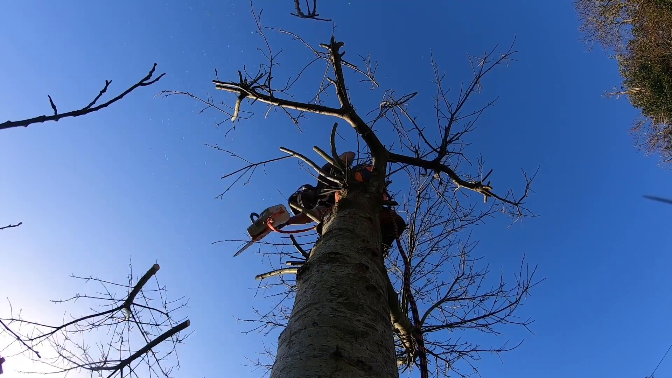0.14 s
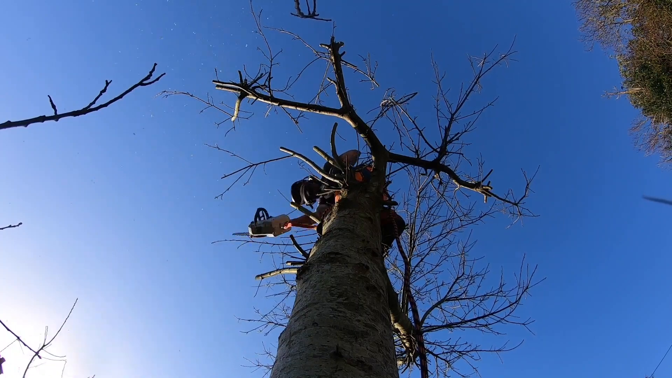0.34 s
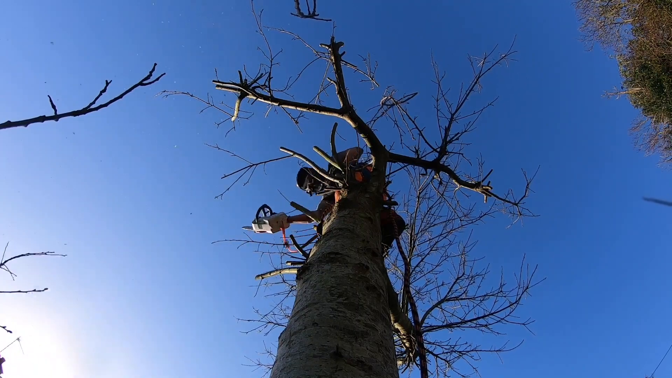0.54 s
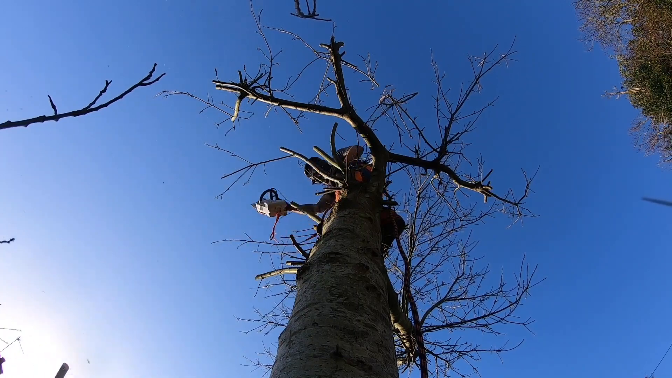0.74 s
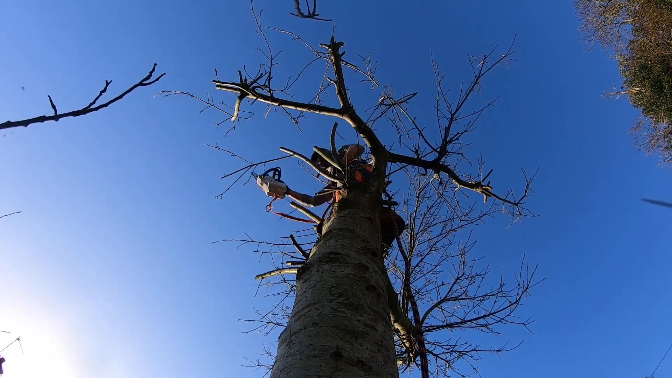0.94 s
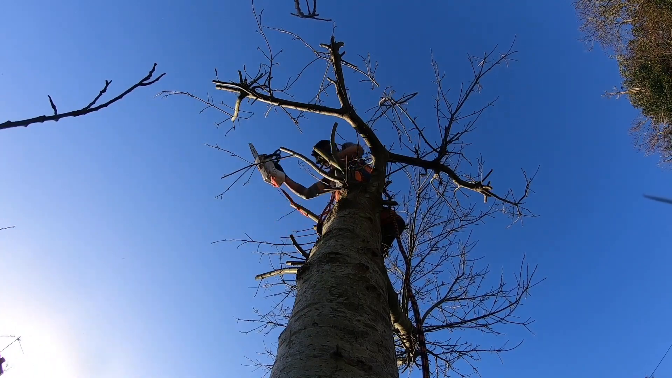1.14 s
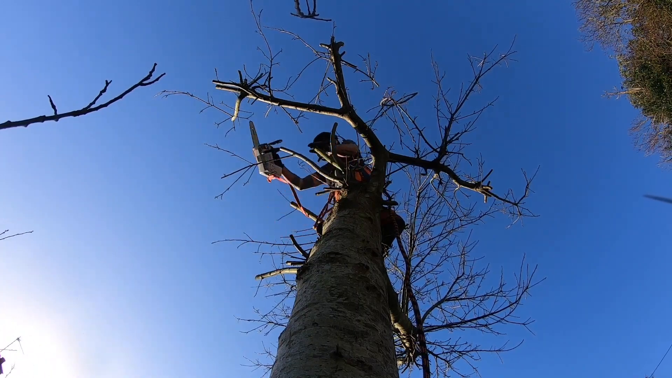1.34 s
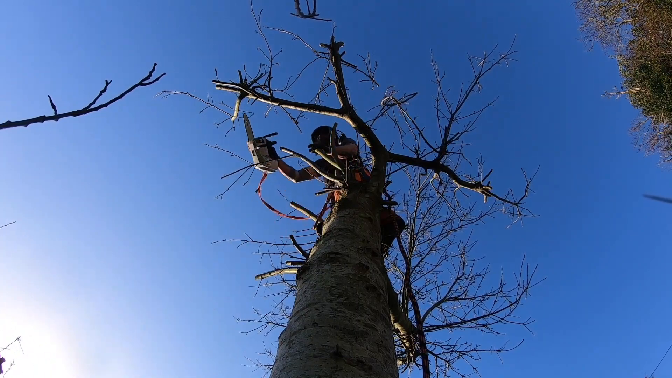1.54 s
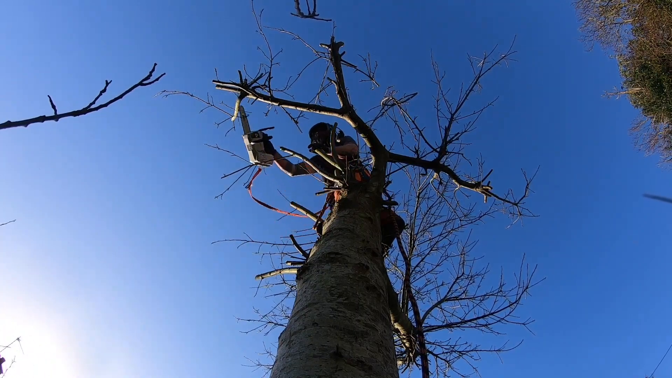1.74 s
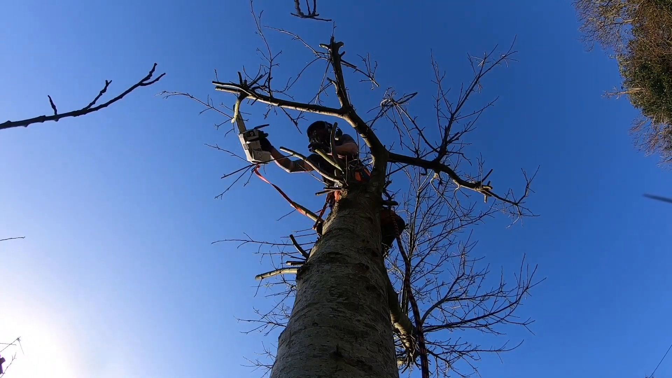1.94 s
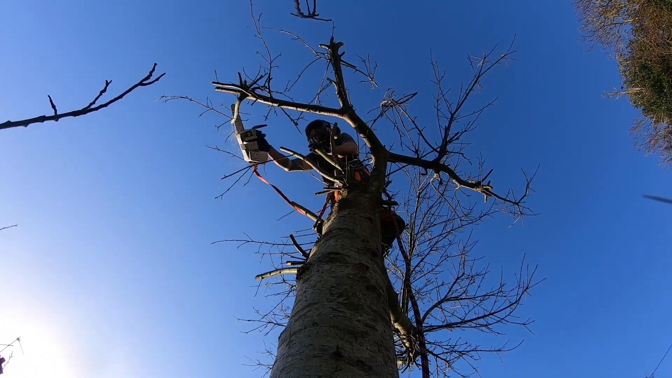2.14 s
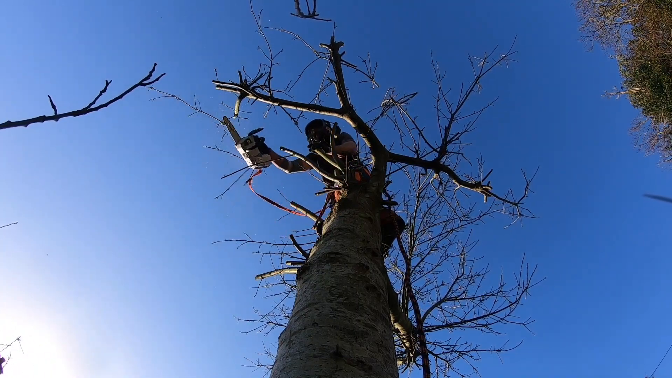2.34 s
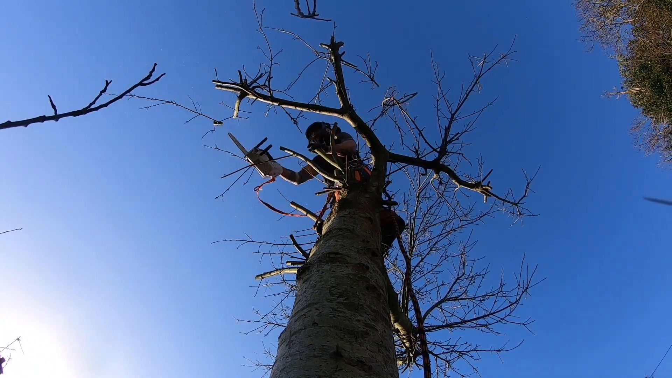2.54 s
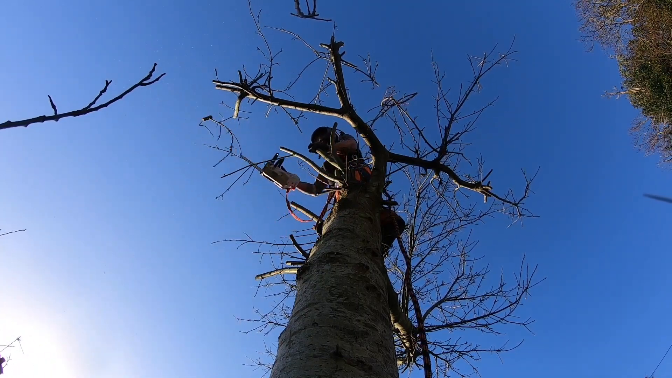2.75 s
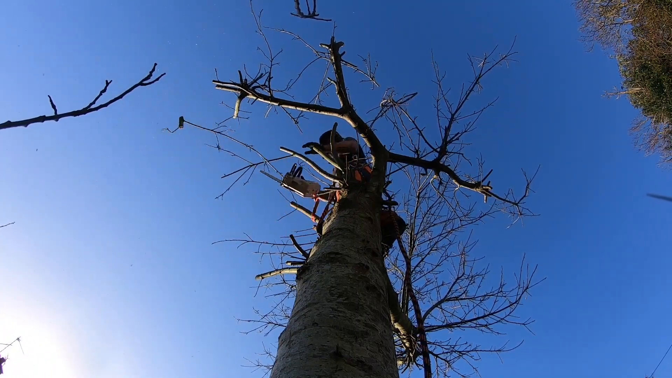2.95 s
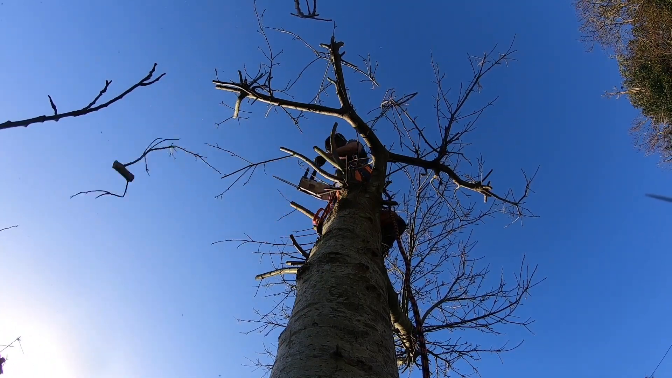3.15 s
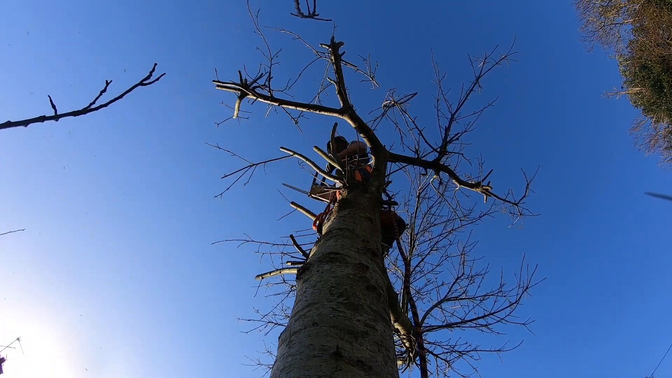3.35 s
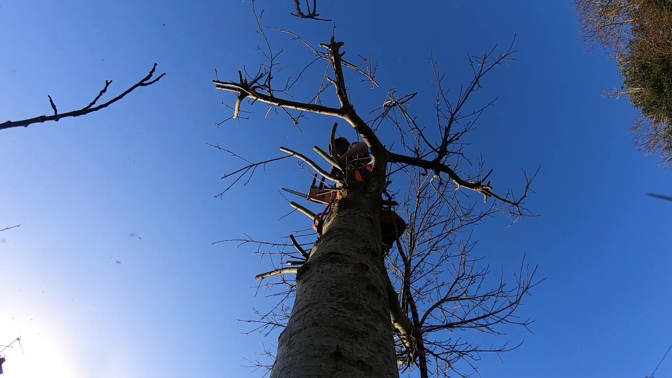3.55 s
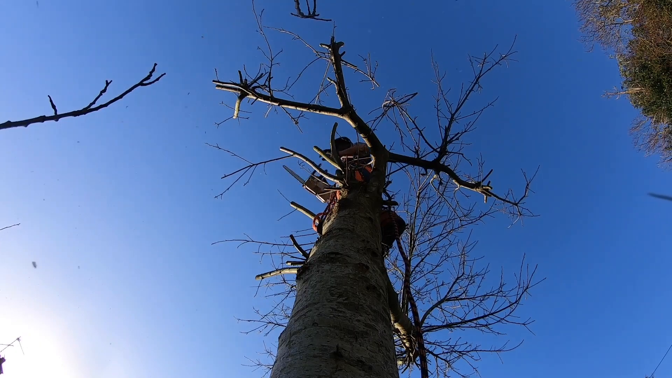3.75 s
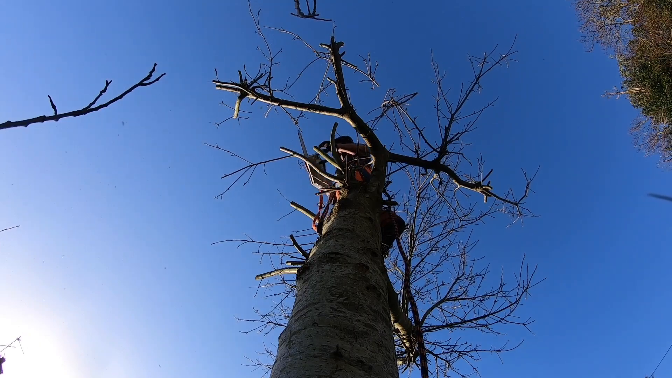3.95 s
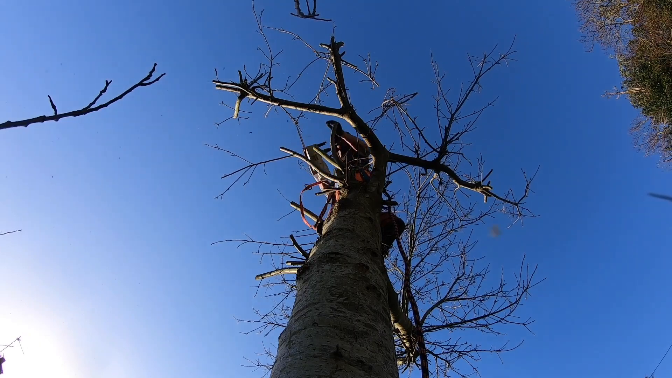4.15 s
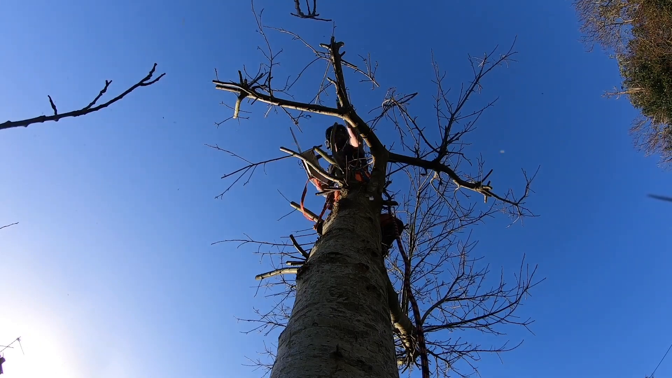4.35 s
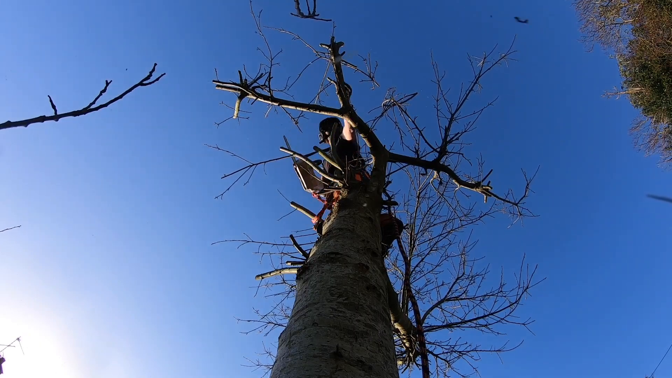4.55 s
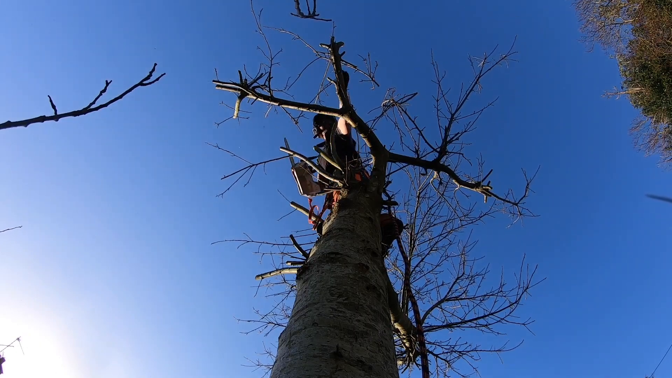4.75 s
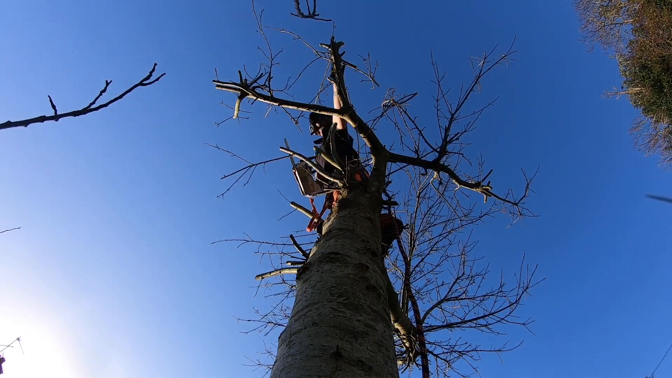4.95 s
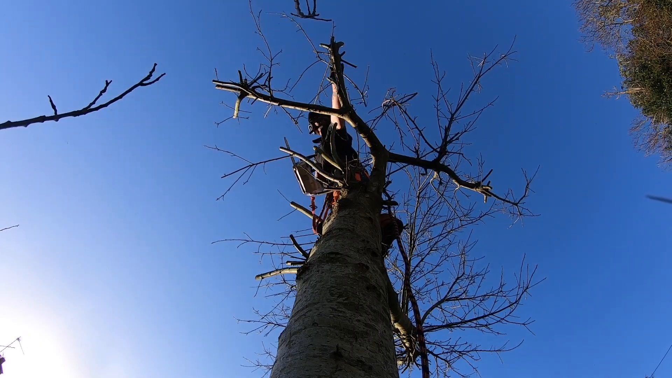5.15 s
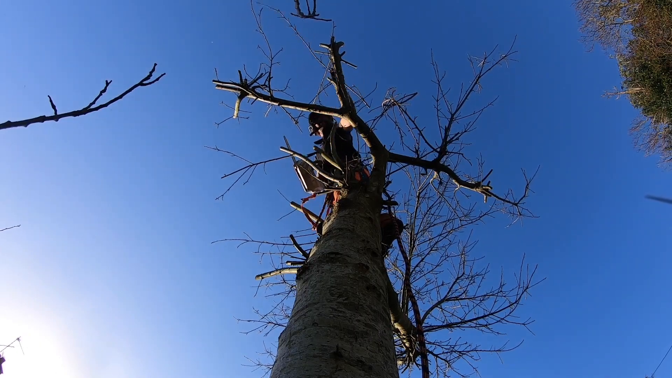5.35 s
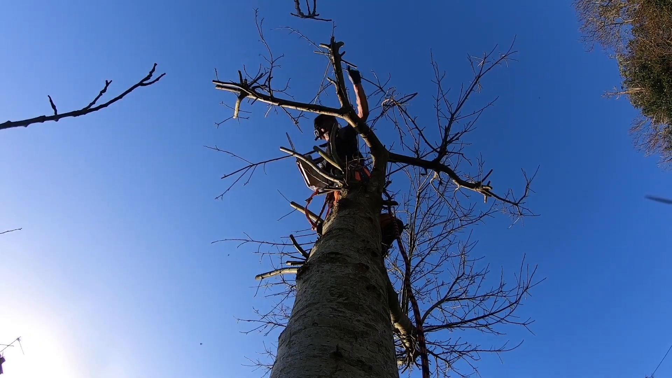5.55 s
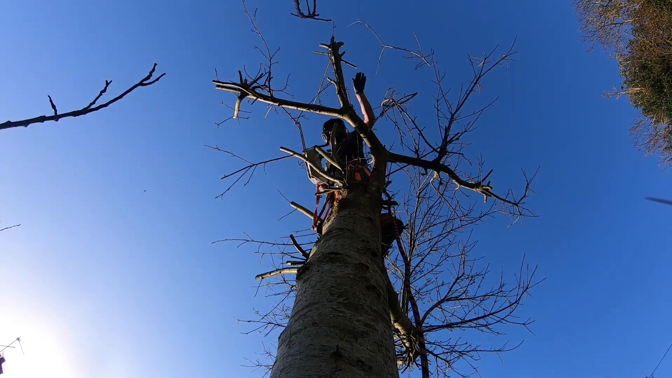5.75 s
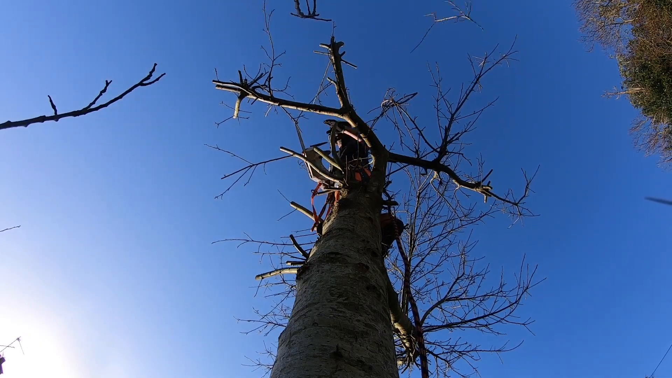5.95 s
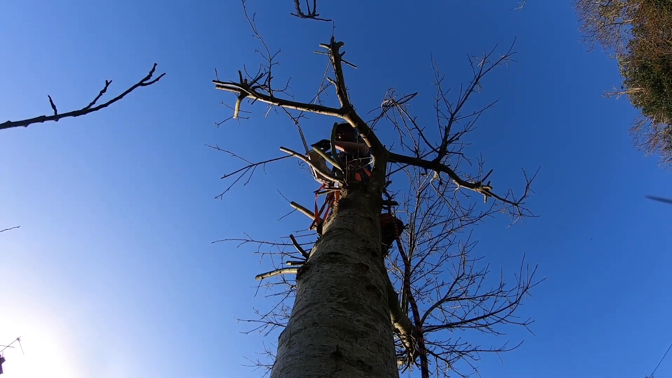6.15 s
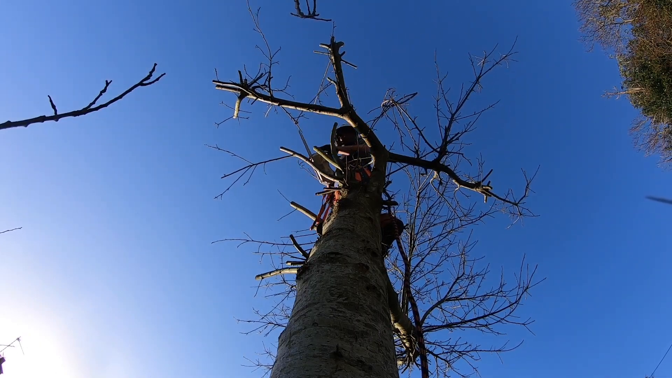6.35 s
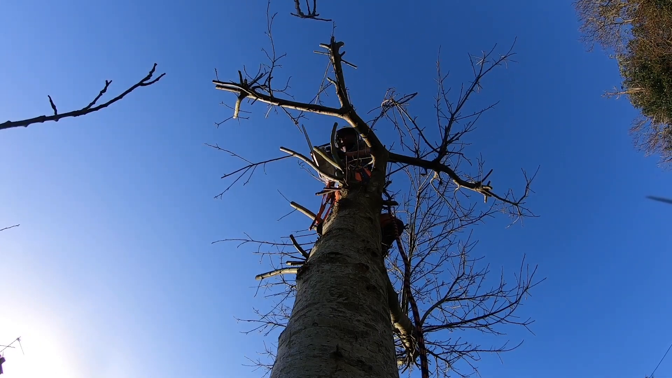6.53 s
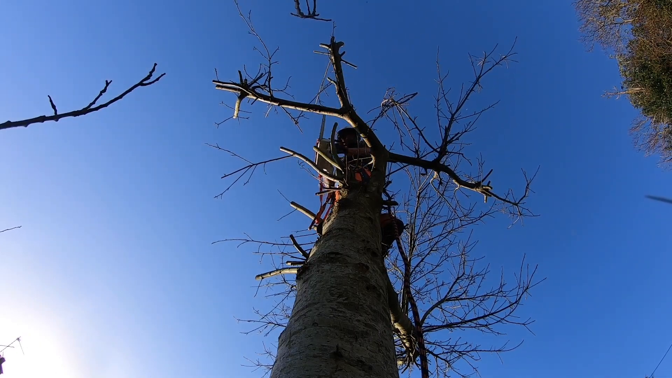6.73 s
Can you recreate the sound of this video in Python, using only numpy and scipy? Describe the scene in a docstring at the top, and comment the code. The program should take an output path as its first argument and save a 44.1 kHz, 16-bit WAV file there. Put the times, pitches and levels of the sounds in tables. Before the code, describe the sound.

A battery chainsaw overhead winds down, a cut branch crashes, then the saw whines up for a short cut and chips tick down.

```python
"""Chainsaw high in a bare tree

A battery saw overhead runs down, then spins up and cuts a limb; the microphone is in a camera at the foot.
Motor harmonics whine, random clicks make the chain rattle, and cutter pulses drum the limb's resonances.
Shaped noise makes a branch crash, chips ticking on the camera and debris; pitch-dropping rings over low
thumps make dull knocks, the first the low end of an earlier cut.
Trilled birds, a far engine note and gusting bands of open air lie behind."""
import sys
import numpy as np
from scipy import signal
from scipy.fft import rfft, irfft, next_fast_len
from scipy.io import wavfile
from scipy.ndimage import uniform_filter1d

SR = 44100
rng = np.random.default_rng(int(sys.argv[2]) if len(sys.argv) > 2 else 0)


def gain_from_db(level_db):
    """Turn a decibel level (scalar or array-like) into a linear amplitude factor."""
    decades = np.asarray(level_db, float) / 20
    return 10 ** decades


def dump(signal):
    """Clip the signal to [-1, 1] and save it as 16-bit WAV at the path in sys.argv[1]."""
    limited = np.clip(np.atleast_2d(signal).T, -1, 1)
    pcm = np.round(limited * 32767).astype(np.int16)
    wavfile.write(sys.argv[1], SR, pcm)


N = 299439
T = np.arange(N) / SR  # s
SIZE = next_fast_len(N + SR)  # room for filter tails
HZ = np.fft.rfftfreq(SIZE, 1 / SR) + 1e-3  # just above 0, safe for logarithms and division

# pulls of the trigger: (pulled [s], let go [s], coasting time [s], chain level at full speed [dB])
TRIGGER_PULLS = [(-1, .068, 0.23, -22), (1.51, 2.4445, 0.22, -22.5)]
# unloaded pole rate, spin-up time, fade of the drive on release, bend of the run-down
FREE_HZ, SPIN_UP_S, LET_GO_S, COAST_BEND = 1313, .155, .008, 1.5
POWER_DB_PER_OCT, COAST_DB_PER_OCT = 4, 6  # rattle against speed, driven and coasting
# below this pole rate the rattle dies away, coasting and driven
SLACK_HZ, SLACK_DB_PER_HZ, POWER_SLACK_DB_PER_HZ = 390, 0.18, 0.05
CUT_S, THROUGH_S = 1.972, 2.25  # chain bites, load leaves the motor
SAG, SAG_LAG_S, LOAD_WHINE_DB = .062, .045, -5  # share of speed lost under load, its lag, change of whine
# broad colour of the chain rattle: (frequency [Hz], level [dB per Hz])
CHAIN_COLOUR = [(120, -36), (350, -10.5), (700, -14), (1500, -14), (2500, -6.5), (4300, -10), (7000, -12.5),
                (15000, -17.5)]
# saw resonances and dead spots: (frequency [Hz], width [Hz], first run [dB], second run [dB])
SAW_RESONANCES = [(1010, 68, 1, 5), (1890, 350, 7, -2.5), (3300, 400, 9.5, 6), (3815, 200, 8.5, 5.5),
                  (4430, 470, -4, -5), (5350, 830, 8, 3.5), (6200, 700, -6, 1), (7140, 700, 6, 2),
                  (8350, 420, -7.5, -8.5), (9430, 1300, 9.5, 2.5), (12490, 4000, 4, -0.5)]
# pole rate and its overtones 2 to 4, over the chain and before the housing: level [dB]
WHINE_HARMONICS = [-11.5, -4, -3.5, -10]
# motor housing's colour, the saw facing another way in each run: (frequency [Hz], first [dB], second [dB])
HOUSING_COLOUR = [(400, -7.5, -6.5), (700, 1, -1.5), (1000, -7, 0), (1270, -12, -10.5), (1910, -2, -11.5),
                  (2500, -1, 0), (3300, -15, -10), (3920, -4, -18), (5200, -1, -1.5)]
# far traffic and breeze, relative: (frequency [Hz], level [dB per Hz])
AIR_COLOUR = [(25, -1.5), (66, -3), (112, -7.5), (160, 1.5), (240, -3), (330, -10), (600, -18),
              (1000, -19.5), (2200, -33.5), (4000, -32.5), (15000, -53.5)]
# stereo spread of the air: (frequency [Hz], side minus mid [dB])
AIR_SPREAD = [(60, -9.5), (250, -11), (900, 4), (4000, -2.5), (10000, -1)]
# overall air: (time [s], level [dB])
AIR_CURVE = [(0, -52), (6.79, -56.5)]
# dull knocks, the first the low end of an earlier cut; before their treble is softened:
# (time [s], knock level [dB], ring [Hz], thump level [dB])
DULL_KNOCKS = [(0.03, -40, 358, -37.5), (0.425, -16, 646, -39.5), (3.403, -25, 450, -54),
               (3.417, -32, 485, -50), (3.429, -36, 262, -33), (3.455, -21, 1300, -38),
               (3.475, -31, 1210, -58), (4.715, -36.5, 240, -39.5), (4.781, -15, 439, -66),
               (4.912, -35.5, 264, -42), (5.41, -49, 680, -46.5), (5.503, -33.5, 1145, -72.5),
               (5.819, -35.5, 275.5, -40), (5.879, -35.5, 331, -41.5), (6.369, -33.5, 390, -77),
               (6.597, -39, 1010, -47)]
THUMP_HZ, THUMP_T60_S = 74.4, 0.28
# a branch thrashing down through twigs: (time [s], level [dB])
CRASH_CURVE = [(.34, -67), (.404, -54), (.415, -44.5), (.7, -50.5), (.85, -46.5), (.89, -55.5), (1.24, -58),
               (1.3, -68.5), (1.5, -63.5)]
# colour of its snapping twigs: (frequency [Hz], level [dB per Hz])
TWIG_COLOUR = [(700, -7.5), (1200, -4.5), (3400, -3), (5000, -11), (9000, -12.5), (15000, -19.5)]
# single twigs breaking in the crash, at the tree: (time [s], peak level [dB], colour [Hz])
TWIG_SNAPS = [(0.7613, -29.5, 5650), (.822, -28, 3400), (0.845, -31, 4000), (0.8938, -33.5, 3300),
              (0.9157, -29.5, 2690), (0.947, -32, 2770), (1.0116, -34, 2250), (1.054, -33, 2300)]
# the limb cut and torn: (time [s], cutter note level [dB], body modes level [dB], deep modes level [dB])
BITE_CURVES = [(1.975, -30, -41, -47.5), (2.04, -29.5, -39, -43.5), (2.11, -41.5, -37, -38.5),
               (2.2, -27, -36, -33), (2.25, -25, -29.5, -31.5), (2.28, -37.5, -22, -31.5),
               (2.315, -45, -30, -29), (2.42, -69.5, -70, -46.5)]
# resonances of the limb: (frequency [Hz], relative level [dB])
LIMB_MODES = [(60, -6.5), (105, -4.5), (151, -2.5), (308, -2.5), (400, -3), (592, 0), (861, -13.5),
              (1040, -7)]
# far birds: (start [s], length [s], start pitch [Hz], end pitch [Hz], level [dB])
BIRD_CALLS = [(3.056, 0.17, 4800, 3910, -70.5), (3.785, .14, 5200, 4850, -73),
              (4.304, .2, 4900, 4930, -60.5), (5.079, 0.24, 5257, 5350, -58),
              (5.576, 0.19, 4560, 3800, -64), (6.279, .2, 5340, 5300, -69)]
# chips on the camera: (time [s], peak level before panning [dB], colour [Hz], left minus right [dB])
CHIP_TICKS = [(3.4033, -33, 2110, 4.5), (3.4502, -32, 3600, 8), (3.477, -34, 3800, 16),
              (3.508, -39, 3600, 1), (3.6737, -36.5, 7000, 0), (3.692, -21, 7400, -8.5),
              (3.706, -28, 4950, -4), (3.7775, -38, 3290, 1), (3.8089, -36, 7900, -0.5),
              (3.8297, -20, 6660, -9.5), (3.9409, -29.5, 9340, 10.5), (3.978, -27, 7940, -8),
              (4.003, -29, 5570, -7), (4.011, -31.5, 4700, -4), (4.1495, -39, 1710, -2),
              (4.1797, -25.5, 7960, 2.5), (4.2437, -18.5, 2470, -2.5), (4.2483, -24, 7700, -18),
              (4.3336, -37.5, 4700, -3.5), (4.516, -30.5, 7270, -7), (4.562, -29.5, 8080, -11),
              (4.577, -30.5, 8250, -18), (4.653, -26, 6300, -10), (4.6702, -27.5, 8450, -3),
              (4.6757, -32.5, 4530, -1), (4.7074, -38.5, 1490, -1), (4.781, -35, 3930, 1),
              (4.943, -21.5, 8970, -2), (5.213, -40.5, 2700, 0), (5.4178, -36.5, 2860, 0),
              (5.499, -37.5, 1680, 3), (5.8683, -45, 2520, -1), (6.3711, -41.5, 2780, 1)]
# ringing of the camera case: (frequency [Hz], level [dB], 60 dB decay [s])
CASE_MODES = [(1626, -18.5, 0.025), (8000, -16.5, 0.011)]
# showers of small debris: (start [s], end [s], twig rustle level [dB], fine grit level [dB])
DEBRIS_SHOWERS = [(3.416, 3.555, -62.5, -59), (3.612, 4.696, -72.5, -65), (5.123, 5.286, -64.5, -75),
                  (5.358, 5.419, -59.5, -73.5), (5.87, 5.933, -66, -92), (6.578, 6.688, -79, -62)]
SHOWER_EDGE_DB_PER_S = 700
# far engine note: (time [s], pitch [Hz], level [dB])
DRONE_CURVE = [(5.6, 200, -65), (6.79, 242.3, -58)]
# sound from above at the two microphone ports:
# (frequency [Hz], left leads [rad], left minus right [dB], unlike part level [dB])
PORT_RESPONSE = [(60, 0, -6, -6), (250, 0, -.5, -22), (690, -.5, -4, -13), (1200, 1.1, 3, -7),
                 (2200, -.3, 2, -20), (4300, 0, -.5, -22), (7000, .5, -1, -10), (8600, 2.2, 4, -5),
                 (14000, 1.6, 4, -1)]
MIC_HZ, MIC_SHELF_DB = 10410, -19.5  # treble loss of the microphone


def unit(x):
    """Scales to rms 1."""
    return x / np.sqrt(np.mean(x ** 2))


def along(table, rest=-150.):
    """Draws a table's columns out over time; levels are silent outside it."""
    s, *columns = np.transpose(table)
    return [np.interp(T, s, c, left=rest, right=rest) for c in columns]


def over_hz(table, order=1):
    """Draws one column of a frequency table on every bin, along log frequency."""
    return np.interp(np.log(HZ), np.log(np.transpose(table)[0]), np.transpose(table)[order])


def colour(x, gain):
    """Weights each frequency."""
    return irfft(rfft(x, SIZE) * gain, SIZE)[..., :N]


def peak(hz, width):
    """One resonance, gain 1 at the centre, width in Hz."""
    return 1 / (1 + 1j * (HZ / hz - hz / HZ) * hz / width)


def walk(rate):
    """Random levels held 1 / rate s and smoothed twice."""
    k = int(SR / rate)
    steps = np.repeat(rng.standard_normal(N // k + 1), k)
    return 1.65 * uniform_filter1d(uniform_filter1d(steps, k), k)[:N]


def clicks(rate, scatter_db):
    """Random clicks, about rate a second, a few much louder than most."""
    size = gain_from_db(scatter_db * np.minimum(rng.exponential(size=N), 5)) * rng.choice([-1, 1], N)
    return unit(size * (rng.random(N) < rate / SR))


def add(out, s, sound):
    """Mixes a short sound in at time s."""
    i = int(s * SR)
    out[..., i:i + sound.shape[-1]] += sound[..., :N - i]


def fade(t, t60):
    """Exponential ring-down by 60 dB in t60 s, held within 0.002 to 1 s."""
    return np.exp(-np.log(1000) * t / np.clip(t60, .002, 1))


def soft(x, width):
    """Zero below 0, x above, rounded at the knee."""
    return width * np.logaddexp(0, x / width)


def motor(pulled, let_go, coast_s, full_db):
    """Pole rate rises to a limit, sags under load and coasts down; the chain level follows it."""
    lag = 1 / (SAG_LAG_S * SR)
    load = signal.lfilter([lag], [1, lag - 1], (T > CUT_S) & (T < THROUGH_S))
    spin_up = 1 - np.exp(-np.clip(T - pulled, 0, None) / SPIN_UP_S)
    coast = np.exp(-(soft(T - let_go, LET_GO_S) / coast_s) ** COAST_BEND)
    hz = 1 + FREE_HZ * spin_up * (1 - SAG * load) * coast
    off = np.clip((T - let_go) / coast_s * 2, 0, 1)  # 0 driven, 1 coasting
    per_oct = POWER_DB_PER_OCT + off * (COAST_DB_PER_OCT - POWER_DB_PER_OCT)
    slack = POWER_SLACK_DB_PER_HZ + off * (SLACK_DB_PER_HZ - POWER_SLACK_DB_PER_HZ)
    chain_db = full_db + per_oct * np.log2(hz / FREE_HZ) - slack * soft(SLACK_HZ - hz, 70.0)
    return hz, chain_db, off, load


def chain_rattle(turn, run):
    """Links slap as random clicks, coloured by the resonances and dead spots of the saw."""
    resonance_db = sum(db[run] * abs(peak(f, w)) ** 2 for f, w, *db in SAW_RESONANCES)
    body = gain_from_db(over_hz(CHAIN_COLOUR) + resonance_db)
    # harder once every four pole periods, and every forty as the chain joint comes round
    beat = 1 + .25 * np.cos(turn / 4) + .1 * np.cos(turn / 40)
    return unit(colour(beat * clicks(12000, 1.2), body))


def motor_whine(hz, turn, run):
    """Harmonics of the pole rate, weaker at low speed, swell through each housing resonance they cross."""
    whine = 0
    for k, db in enumerate(WHINE_HARMONICS):
        level = gain_from_db(db + 2.6 * walk(45) - 0.039 * soft(560 - hz, 39.0))
        whine = whine + level * np.sin((k + 1) * turn)
    return colour(whine, gain_from_db(over_hz(HOUSING_COLOUR, order=run + 1)))


def saw():
    """Motor speed drives whine and rattle in both runs, and the cutters drum the limb in the second."""
    out = 0
    for run, pull in enumerate(TRIGGER_PULLS):
        hz, chain_db, off, load = motor(*pull)
        turn = 2 * np.pi * np.cumsum(hz * (1 + 0.0025 * walk(90))) / SR  # phase of the pole rate
        out = out + gain_from_db(chain_db + 0.18 * walk(29.83)) * chain_rattle(turn, run)
        # the whine sinks under load and as the motor coasts
        whine_db = chain_db - 6.3 * off + LOAD_WHINE_DB * load
        out = out + np.sqrt(2) * gain_from_db(whine_db) * motor_whine(hz, turn, run)
    return out + limb_drumming(turn)


def air():
    """Far traffic and breeze: noise in octave bands that each flicker, the bass gusting most."""
    out, shape = 0, gain_from_db(over_hz(AIR_COLOUR))
    for hz in 30 * 2. ** np.arange(10):
        band = shape * np.clip(1 - abs(np.log2(HZ / hz)), 0, 1) ** .5
        mid = colour(rng.standard_normal(N), band)
        side = colour(rng.standard_normal(N), band * gain_from_db(over_hz(AIR_SPREAD)))
        gust_db = (1 + 150 / (hz + 60)) * walk(9) + 1.5 * walk(2)
        out = out + gain_from_db(gust_db) * (mid + side * np.array([[1], [-1]]))
    s, db = np.transpose(AIR_CURVE)
    return gain_from_db(np.interp(T, s, db)) * unit(out)


def knocks():
    """Dull knocks, the first the low end of an earlier cut: pitch-dropping ring, broad tail and low thump."""
    out, t = np.zeros(N), T[:SR // 3]
    chance = rng.standard_normal((len(DULL_KNOCKS), 2, len(t)))
    boom = signal.iirpeak(THUMP_HZ * 1.54, 1.5, SR)
    for (s, db, hz, thump_db), noise in zip(DULL_KNOCKS, chance):
        ring = np.sin(2 * np.pi * hz * t * (1 - 12 * t)) * fade(t, 7 / hz) * (1 - np.exp(-t / 0.0009))
        dull = signal.iirpeak(hz * 0.7, 1.4, SR)
        tail = unit(signal.lfilter(*dull, signal.lfilter(*dull, noise[0]))) * fade(t, 50 / hz)
        rumble = 0.78 * unit(signal.lfilter(*boom, noise[1]))
        thump = (np.sin(2 * np.pi * THUMP_HZ * t) + rumble) * fade(t, THUMP_T60_S)
        add(out, s, gain_from_db(db) * (1.4 * ring + 0.2 * tail) + gain_from_db(thump_db) * thump)
    # little treble
    return colour(out, 1 / (1 + 1j * HZ / 1470.0) ** 2)


def crash():
    """A cut branch whips through twigs and settles: dense snaps over a woody rustle."""
    db, = along(CRASH_CURVE)
    dense = unit(colour(clicks(1500, 3.0) + rng.standard_normal(N), gain_from_db(over_hz(TWIG_COLOUR))))
    rustle = unit(colour(clicks(1000, 1.4), peak(640.0, 980.0) ** 2))
    return gain_from_db(db) * (gain_from_db(2 * walk(90)) * dense + gain_from_db(-7.0 + 0.91 * walk(40)) * rustle)


def snaps():
    """Single twigs break: short noise bursts in a narrow colour."""
    out, t = np.zeros(N), T[:SR // 30]
    chance = rng.standard_normal((len(TWIG_SNAPS), len(t)))
    for (s, db, hz), noise in zip(TWIG_SNAPS, chance):
        ring = signal.iirpeak(hz, 1.6, SR)
        crack = signal.lfilter(*ring, signal.lfilter(*ring, noise * fade(t, 0.015)))
        add(out, s, gain_from_db(db) * crack / abs(crack).max())
    return out


def limb_drumming(turn):
    """Cutter pulses and random tearing of the grain excite the resonances of the limb."""
    note_db, body_db, deep_db = along(BITE_CURVES)
    # a cutter every second pole, uneven over eight poles
    pulses = np.exp(1.5 * np.cos(turn / 2 + .8 * walk(80)))
    cutters = pulses * (1 + .4 * np.cos(turn / 8)) * gain_from_db(3.0 * walk(200))
    push = unit(cutters - uniform_filter1d(cutters, SR // 30)) + 1.3 * clicks(4000, 1.5)
    out, cutting = 0, note_db > -99
    for hz, db in LIMB_MODES:
        ring = colour(push, peak(hz, 30 + 0.1 * hz) ** 2)
        curve_db = deep_db if hz < 200 else note_db if 500 < hz < 700 else body_db
        out = out + gain_from_db(curve_db + db + 1.6 * walk(60)) * ring / ring[cutting].std()
    return out


def birds():
    """Thin trilled whistles gliding in pitch, their level blurred by distance."""
    out = np.zeros((2, N))
    for s, length, hz0, hz1, db in BIRD_CALLS:
        n = int(length * SR)
        blur = uniform_filter1d(rng.standard_normal((2, n)), SR // 400, axis=1)
        hz = np.linspace(hz0, hz1, n) + 160 * np.sin(2 * np.pi * 26 * T[:n])
        whistle = np.sin(2 * np.pi * np.cumsum(hz) / SR)
        add(out, s, gain_from_db(db) * unit(blur) * np.hanning(n) ** .5 * whistle)
    return out


def ticks():
    """Each chip is a sharp noise crack in its own colour that also rings the camera case."""
    out, t = np.zeros((2, N)), T[:SR // 16]
    chance = rng.standard_normal((len(CHIP_TICKS), 2, len(t)))
    for (s, db, hz, pan_db), noise in zip(CHIP_TICKS, chance):
        # hard bright chips stop at once, dull ones skid; a faint rattle follows
        stereo = noise[0] + .6 * noise[1] * np.array([[1], [-1]])
        blow = stereo * (fade(t, 25 / hz) + .08 * fade(t, .025))
        crack = signal.lfilter(*signal.iirpeak(min(hz, 12000), .9, SR), blow)
        # dull chips ring the case less
        case = sum(gain_from_db(g) * min(1, hz / f) ** 2 * np.sin(2 * np.pi * f * t) * fade(t, t60)
                   for f, g, t60 in CASE_MODES)
        sound = crack + 0.13 * signal.fftconvolve(blow, case[None])[:, :len(t)]
        pan = np.array([[pan_db], [-pan_db]]) / 2
        add(out, s, gain_from_db(db + pan) * sound / abs(sound.mean(axis=0)).max())
    return out


def patter():
    """Twigs rustle and sawdust lands all around: scattered grains, each a short skid of noise."""
    out, skid = 0, fade(T[:SR // 100], .008)
    kinds = [(2420.0, 3200.0, 360, 1.4), (7500., 6600.0, 55, 3.0)]  # Hz, width Hz, grains a second, scatter dB
    for kind, (hz, width, rate, scatter_db) in enumerate(kinds):
        gain = 0
        for start, end, *db in DEBRIS_SHOWERS:
            outside_s = np.clip(np.maximum(start - T, T - end), 0, None)
            gain = gain + gain_from_db(db[kind] - SHOWER_EDGE_DB_PER_S * outside_s)
        grains = []
        for _ in range(3):  # one shared by both channels, then left and right
            envelope = signal.fftconvolve(abs(clicks(rate, scatter_db)), skid)[:N] + 1.5
            grains.append(envelope * rng.standard_normal(N))
        tone = peak(hz, width) ** 2
        stereo = np.array([unit(colour(grains[0] + 1.6 * own, tone)) for own in grains[1:]])
        out = out + gain * gain_from_db(2.8 * walk(33)) * stereo
    return out


def drone():
    """A far engine note, one sine wavering in pitch and level."""
    hz, db = along(DRONE_CURVE)
    phase = 2 * np.pi * np.cumsum(hz * (1 + 0.0062 * walk(25))) / SR
    return np.sqrt(2) * gain_from_db(db + 3.9 * walk(46)) * np.sin(phase)


def from_above(x):
    """The ports shade and delay it differently; the tree scatters a part unlike left and right."""
    half = gain_from_db(over_hz(PORT_RESPONSE, order=2) / 2) * np.exp(.5j * over_hz(PORT_RESPONSE))
    unlike = gain_from_db(over_hz(PORT_RESPONSE, order=3))
    t = T[:SR // 8]
    scattered = []
    for _ in range(2):
        echoes = unit(rng.standard_normal(len(t)) * fade(t, 0.22)) / np.sqrt(len(t))
        scattered.append(colour(signal.fftconvolve(x, echoes)[:N], unlike))
    return np.array([colour(x, half), colour(x, 1 / half)]) + scattered


def scene():
    """Saw, crash and snaps come from overhead; the other layers are added as they are."""
    overhead = from_above(saw() + crash() + snaps())
    return overhead + air() + knocks() + birds() + ticks() + patter() + drone()


def band_limit(x):
    """A steep low-pass at the top of the band."""
    return signal.sosfilt(signal.butter(12, 15120, fs=SR, output="sos"), x)


def record(dry):
    """The camera's microphone loses the deepest bass and falls off sharply in the top octave."""
    treble_loss = gain_from_db(MIC_SHELF_DB / (1 + (MIC_HZ / HZ) ** 24))
    bass_loss = 1 + (38 / HZ) ** 4
    return band_limit(colour(dry, treble_loss / bass_loss))


dry = scene()
out = record(dry)
dump(out)
```